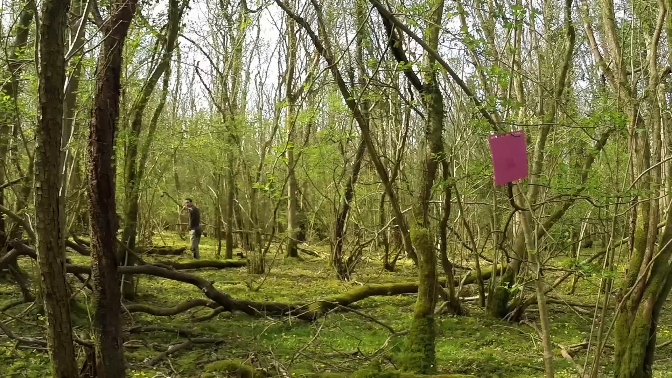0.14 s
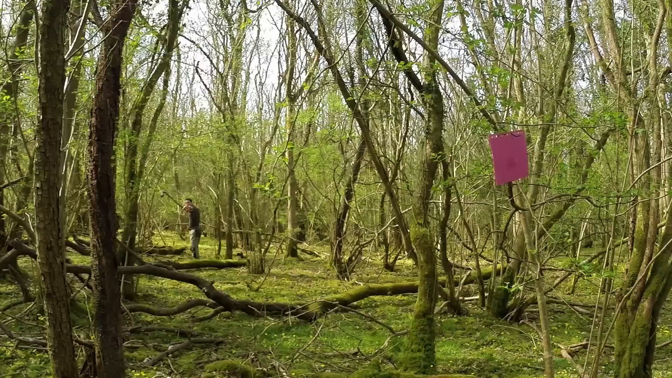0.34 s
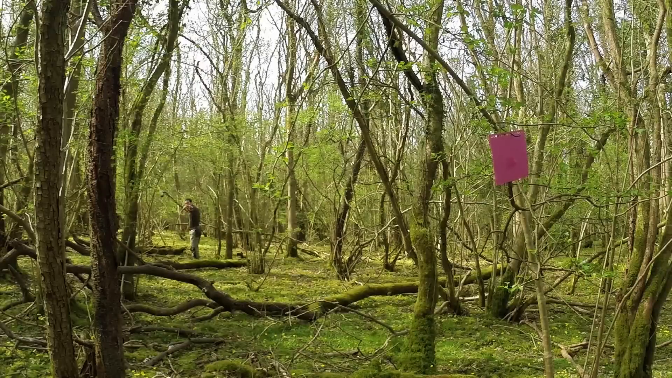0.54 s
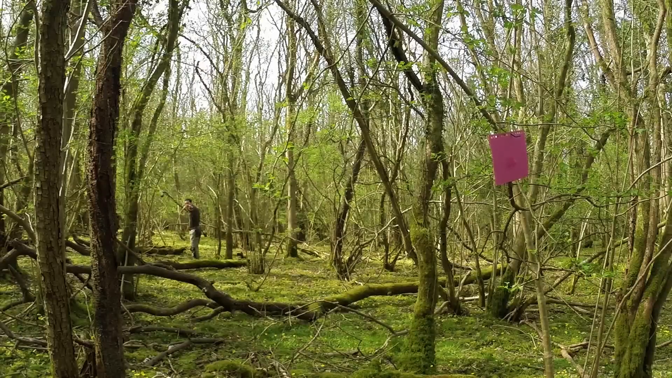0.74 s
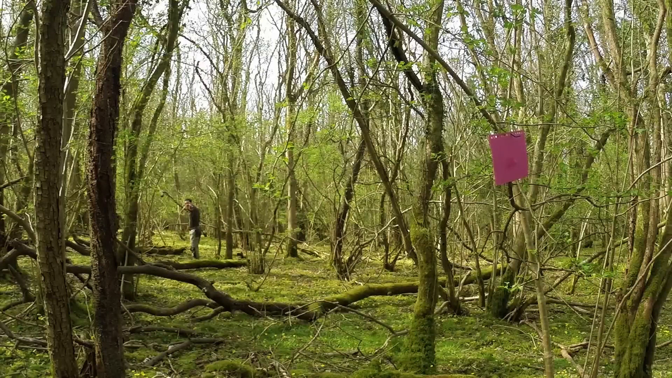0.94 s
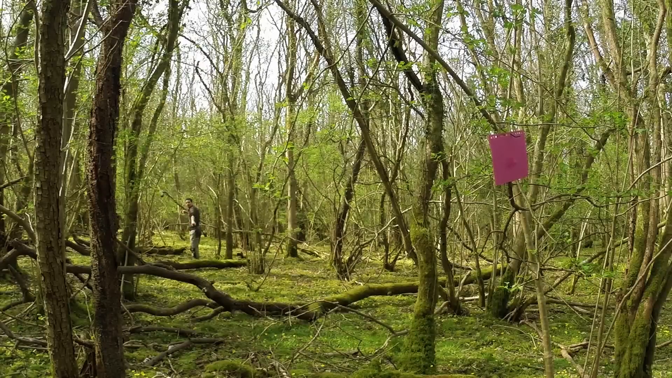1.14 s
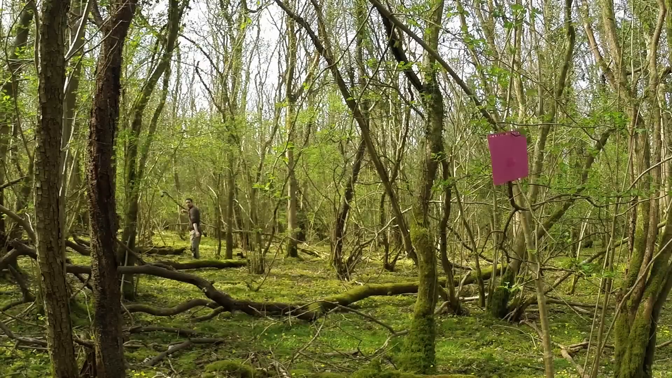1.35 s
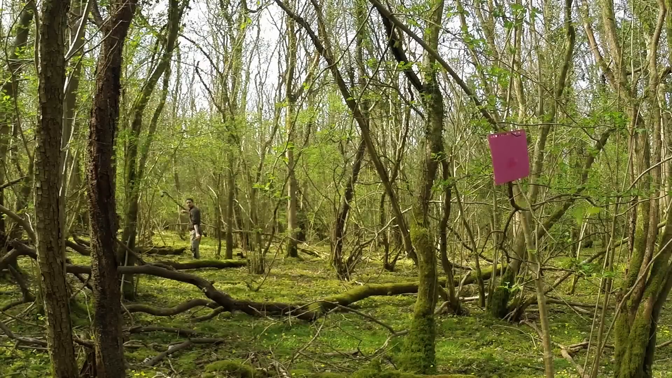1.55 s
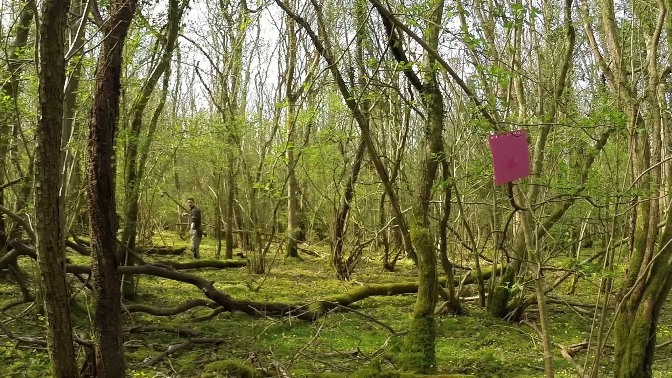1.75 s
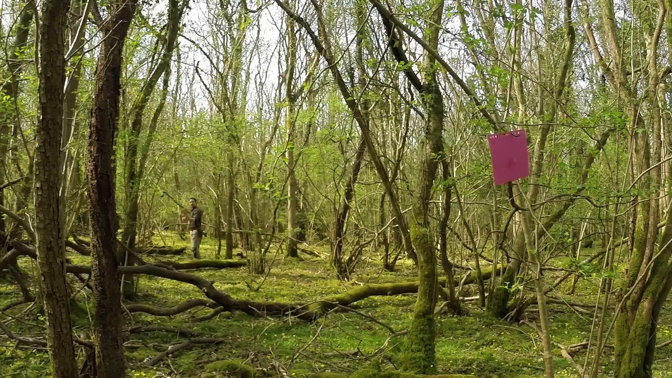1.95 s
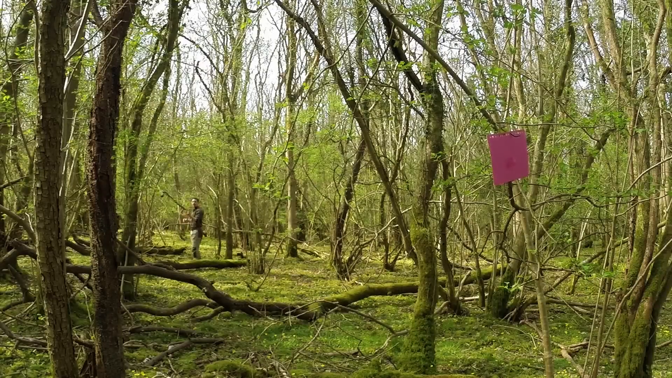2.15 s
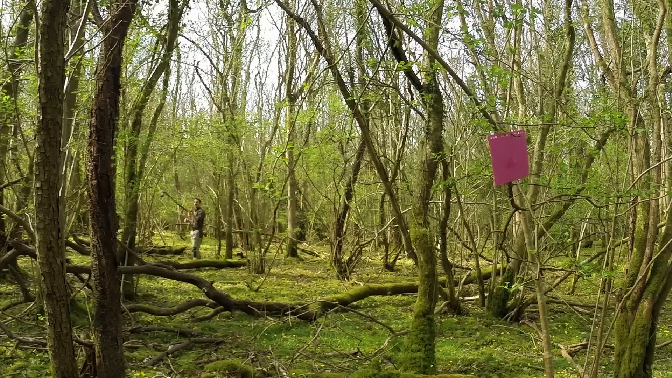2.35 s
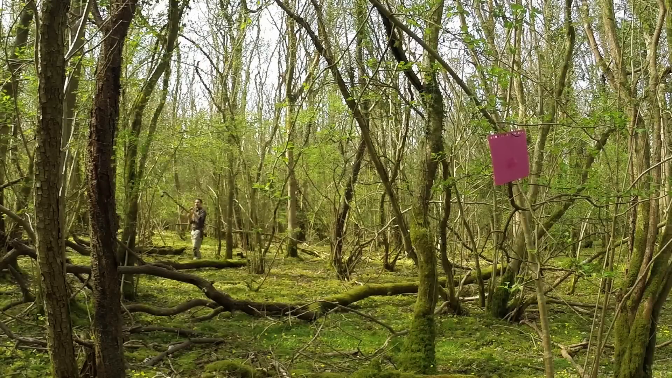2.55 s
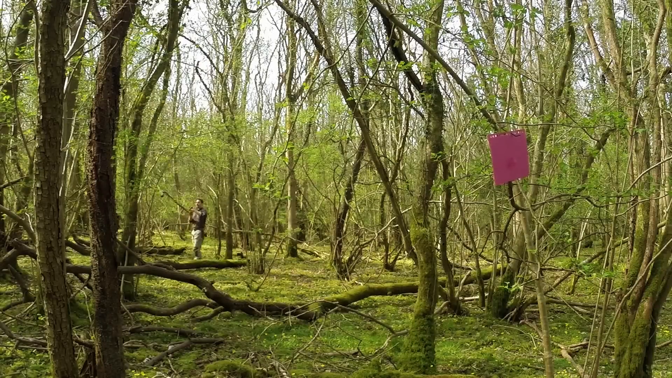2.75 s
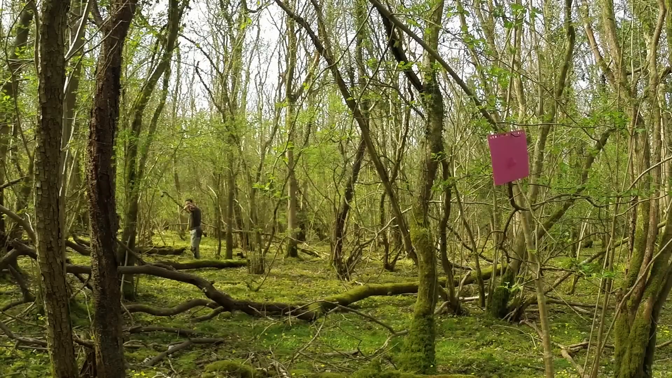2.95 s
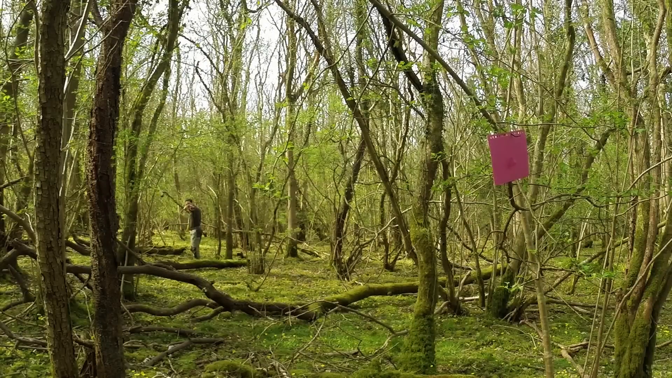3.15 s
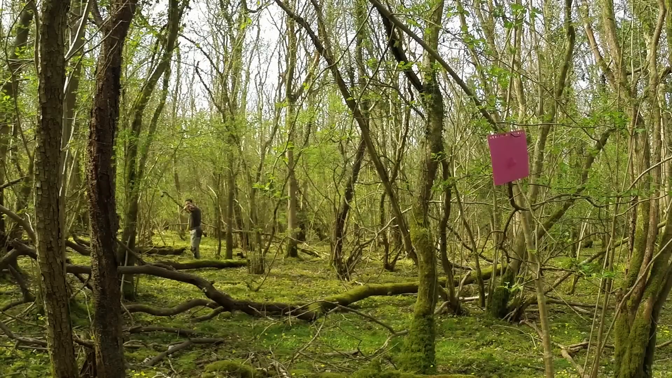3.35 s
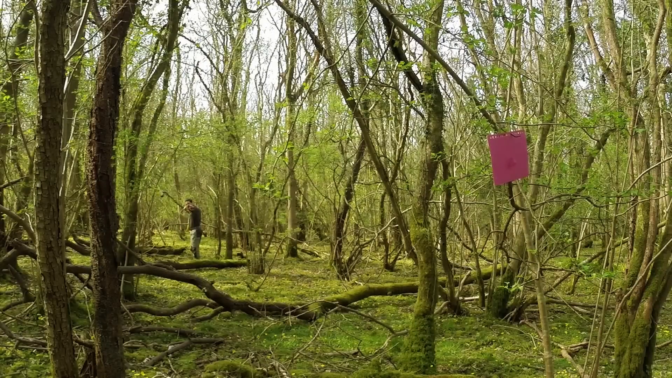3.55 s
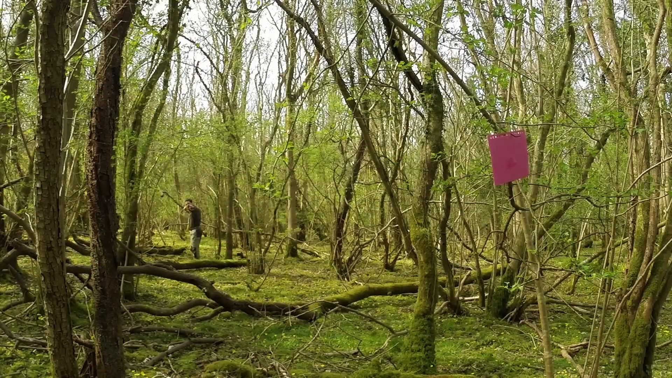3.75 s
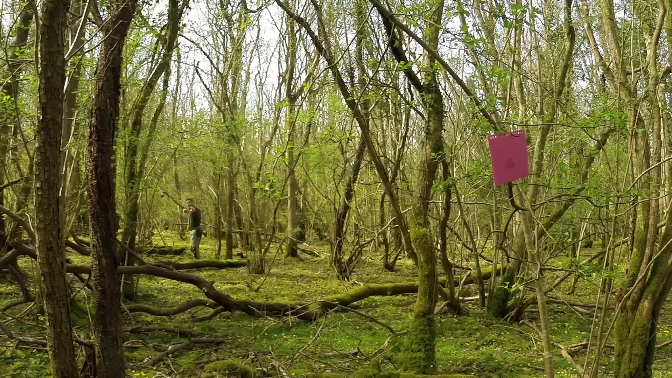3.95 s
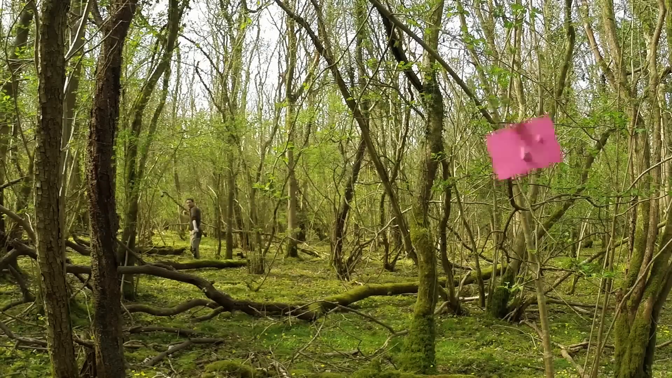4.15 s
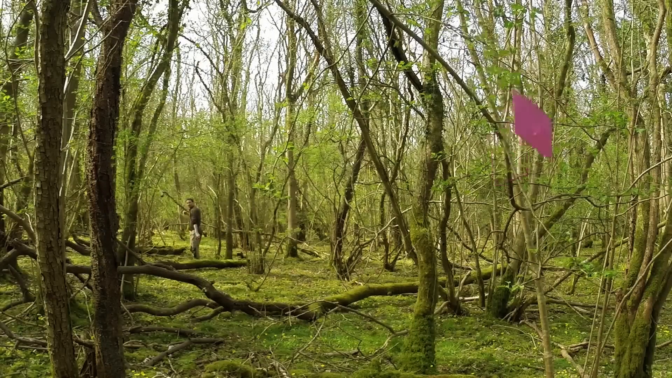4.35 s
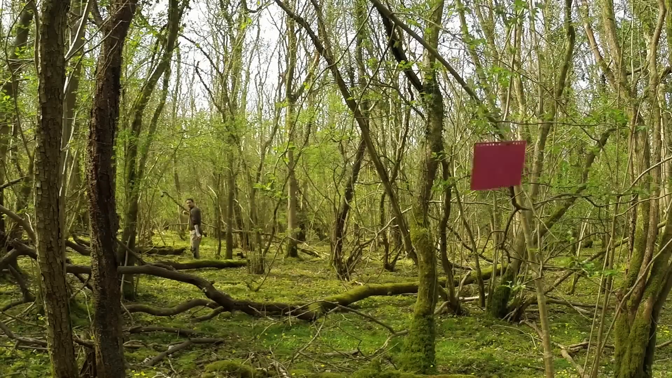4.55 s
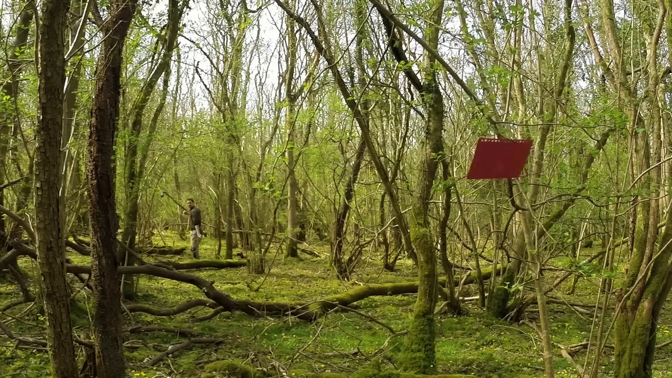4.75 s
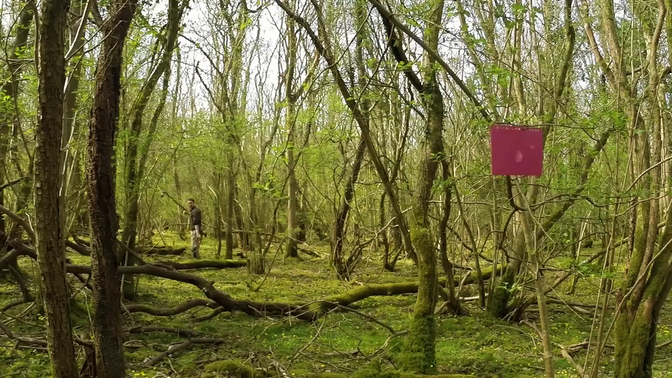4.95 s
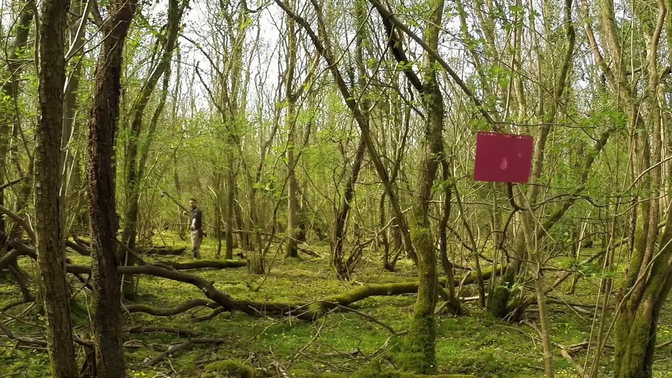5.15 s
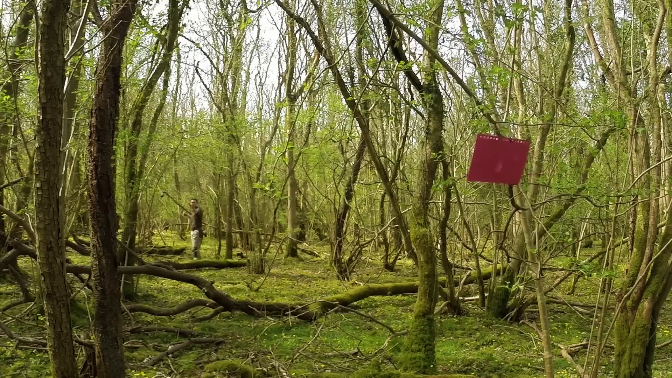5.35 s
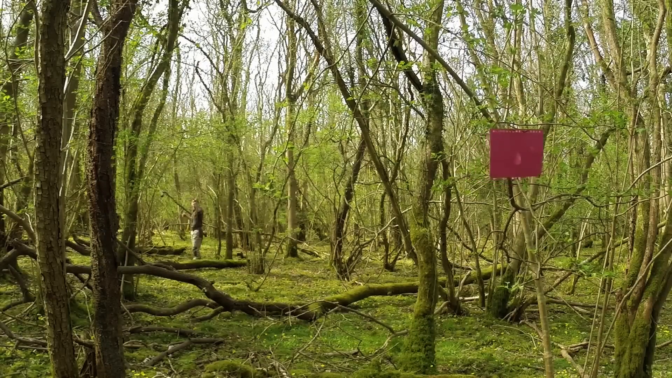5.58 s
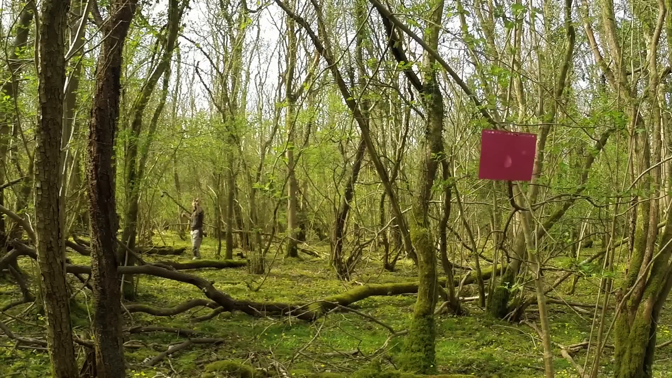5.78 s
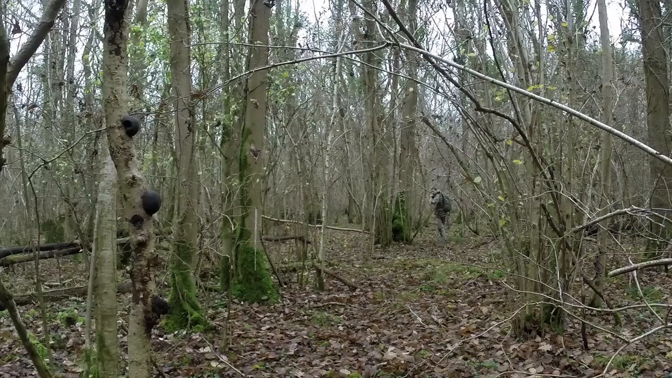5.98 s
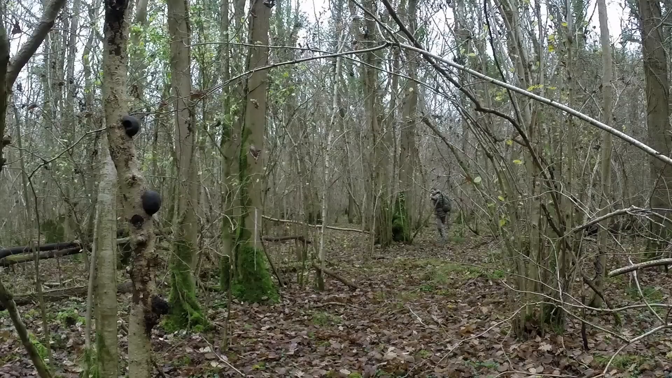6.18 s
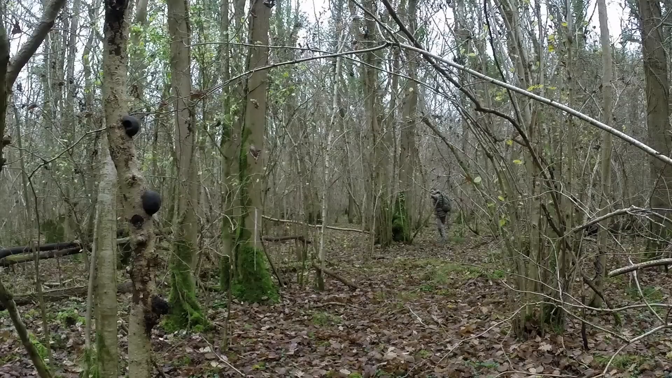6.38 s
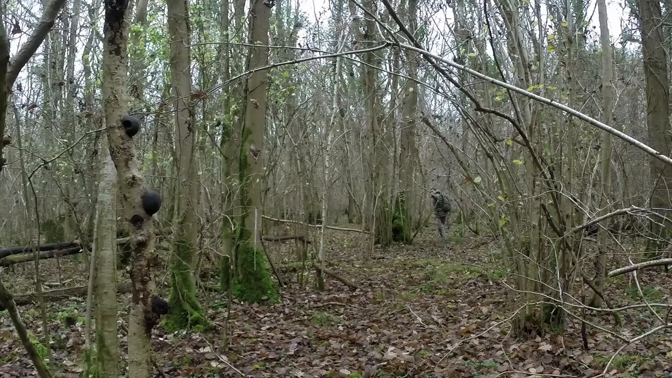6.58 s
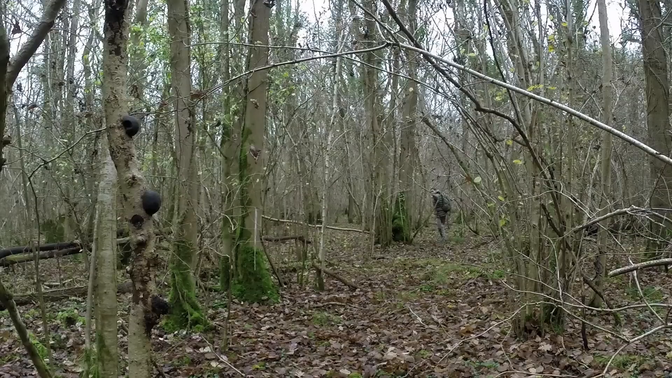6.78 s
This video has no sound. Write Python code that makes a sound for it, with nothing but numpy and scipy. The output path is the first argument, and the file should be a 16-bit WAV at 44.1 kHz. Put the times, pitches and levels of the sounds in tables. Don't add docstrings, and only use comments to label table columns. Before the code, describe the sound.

Far birds whistle and call while a woodpecker drums softly on a hollow bough. Rubber bands snap, a ball rushes past and knocks on wood with sharp rebounds and a long woodland echo. After thin, high birdsong, another snap is followed almost at once by a distorted smack on a spinning card, which flexes and rattles as the level ducks. Quick chirps return, and low puffing wind strikes the little microphone.

```python
import sys
import numpy as np
from scipy import signal
from scipy.io import wavfile
from scipy.ndimage import uniform_filter1d

SR = 44100
rng = np.random.default_rng(int(sys.argv[2]) if len(sys.argv) > 2 else 0)


def magnitude_from_level(level_db):
    exponent = np.asarray(level_db, float) / 20
    return 10 ** exponent


def unload_audio(sound):
    columns = np.transpose(np.atleast_2d(sound))
    steps = np.round(np.clip(columns, -1, 1) * 32767)
    wavfile.write(sys.argv[1], SR, steps.astype(np.int16))


N = 300762
TIME = np.arange(N) / SR

# [f/Hz, level/dB per Hz]
SNAP_TAILS = [
    [(29, -53.5), (50, -16), (170, -0.5), (237, -10.5), (465, -15.5), (499, -3), (576, -7.5), (3490, -3),
     (4300, -5), (5100, 1.5), (5700, -0.5), (6490, -9), (10500, -6.5), (15400, -27.5)],
    [(29, -45), (50, -17), (348, -8), (432, -15.5), (524, -6.5), (953, -12), (1150, -6.5), (1870, -11),
     (2150, -3.5), (3560, -5), (4000, -6.5), (4460, -0.5), (4900, -1.5), (5500, -9.5), (10200, -9),
     (15400, -38)],
]
# [f/Hz, level/dB per Hz]
CARD_TAIL = [(59, -49), (100, -18), (420, -12), (600, -14.5), (800, -11), (1330, -4.5), (2300, -2),
             (3000, -1), (3600, -9), (5100, -15.5), (8900, -24.5), (12700, -30), (15400, -43)]


def evened(x):
    return x / np.sqrt(np.mean(x ** 2) + 1e-20)


def read(points, hz):
    f, value = np.transpose(points)
    return np.interp(np.log(hz + 1), np.log(f + 1), value)


def add(mix, s, sound):
    part = mix[..., round(s * SR):][..., :sound.shape[-1]]
    part += sound[..., :part.shape[-1]]


def columns(rows):
    s, *values = np.transpose(rows)
    t = np.arange(s[0], s[-1], 1 / SR)
    return s[0], *(np.interp(t, s, v) for v in values)


def resonate(x, hz, width):
    turn = np.exp(2j * np.pi * np.cumsum(hz * np.ones(len(x))) / SR)
    r = np.exp(-np.pi * width / SR)
    return 2 * (turn * signal.lfilter([1 - r], [1, -r], x / turn + 1e-18)).real


def noise(seconds, colour, same=1., tilt_db=0., t60=None, patchy_db=0., size=512):
    edge_hz = 15350
    hop = size // 4
    frames, hz = int(seconds * SR) // hop + 5, np.fft.rfftfreq(size, 1 / SR)
    a, b, c, d, patches = rng.standard_normal((frames, len(hz), 5)).T
    patches = uniform_filter1d(uniform_filter1d(patches, size=6, axis=0), size=9, axis=1)
    tilted_db = read(colour, hz) + tilt_db * np.log2((hz + 50) / 2500)
    edge_db = 60 * np.clip((hz - edge_hz) / 200, 0, 1)
    db = (tilted_db - edge_db)[:, None] + patchy_db * evened(patches)
    if t60:
        db = db - 60 * np.arange(frames) * hop / SR / read(t60, hz)[:, None]
    same = np.clip(same if np.isscalar(same) else read(same, hz)[:, None], -1, 1)
    mid = a + 1j * b
    apart = np.sqrt((1 - same) / (1 + same + 1e-9)) * (c + 1j * d)
    z = np.array([mid + apart, mid - apart]) * magnitude_from_level(db)
    return signal.istft(z, nperseg=size, noverlap=size - hop)[1][:, :int(seconds * SR)]


def scattered(colour, tilt_db, stretch, build_s, near_db, seconds):
    # [f/Hz, t60/s]
    trunks = [(100, 0.46), (400, 0.97), (1000, 1.39), (1550, 1.31), (2000, 1.16), (3500, 1.064),
              (6000, 0.81), (10000, 0.43), (15000, .3)]
    decay = [(f, t60 * stretch) for f, t60 in trunks]
    tail = noise(seconds, colour, 1.0, tilt_db, decay, patchy_db=.5, size=256)
    t = TIME[:tail.shape[1]]
    near = 1 + magnitude_from_level(near_db) * np.exp(-t / 0.055)
    return tail / np.sqrt(np.mean(tail[:, :800] ** 2)) * near * (1 - np.exp(-t / build_s))


def sung(notes, arch, rise, sag_db):
    for s, length, from_hz, to_hz, db in notes:
        u = np.linspace(0, 1, int(length * SR))
        hz = (from_hz + (to_hz - from_hz) * u) * (1 + arch * np.sin(np.pi * u))
        yield s, hz, db - 8 * np.maximum(1 - u / rise, 0) - sag_db * u ** 2


def whirr(curves, width, skirt):
    out = np.zeros(N)
    for s, hz, db in curves:
        white = rng.standard_normal(len(hz))
        core = evened(resonate(resonate(white, hz, width), hz, width))
        wide = evened(resonate(resonate(white, hz, 4 * width), hz, 4 * width))
        add(out, s, magnitude_from_level(db) * evened(core + skirt * wide) * signal.windows.tukey(len(hz), .12))
    return out


def hush():
    # [f/Hz, level/dB per Hz]
    colour = [(15, -39), (25, -13), (64, 1.5), (122, -7.5), (155, 3.5), (188, -10), (312, -8.5),
              (409, -12.5), (645, -13), (844, -14.5), (915, -16), (4010, -24), (6330, -27.5),
              (14200, -29.5), (15400, -36.5)]
    # [f/Hz, likeness]
    likeness = [(60, 1), (190, .9995), (330, .994), (550, 0.988), (1100, 0.996), (3400, 0.997),
                (5500, 0.92), (11000, 0.9), (12800, 0.97)]
    return magnitude_from_level(-55) * evened(noise((N + 9) / SR, colour, likeness, patchy_db=2.0, size=1024))[:, :N]


def breeze():
    fading = (-45.5, 27)
    # [f/Hz, level/dB per Hz]
    colour = [(15, -40), (25, -14), (86, 6), (273, -19), (304, -10), (891, -6), (1410, -10), (1840, -11),
              (3240, -15), (15400, -40.5)]
    start_db, loss_db = fading
    out, db = np.zeros((2, N)), start_db - loss_db * TIME[:SR]
    rustle = evened(noise(1.2, colour, 1.0, patchy_db=0.0, size=1024))[:, :len(db)]
    add(out, 0, magnitude_from_level(db - 3.5) * rustle)
    return out


def gust():
    # [t/s, level/dB, f/Hz]
    moan_curve = [
        (5.55, -81.5, 171.8),
        (5.8, -55.5, 169.5),
        (6.03, -42, 168.4),
        (6.28, -43, 181),
        (6.48, -40.5, 197.4),
        (6.62, -43, 175.2),
        (6.82, -40, 190),
    ]
    # [t/s, half width/s, level/dB]
    puffs = [(6.078, 0.029, 7), (6.203, .022, 10), (6.31, 0.021, 9), (6.36, 0.024, 9), (6.42, 0.02076, 8),
             (6.53, 0.023, 5.5), (6.592, 0.013, 3.5), (6.658, 0.016, 14), (6.795, 0.025, 9)]
    # [f/Hz, level/dB per Hz]
    roar_colour = [(15, -52), (25, -29), (48, 1.5), (122, -8), (168, -2.5), (214, -3), (398, -29),
                   (758, -22.5), (992, -24.5), (1230, -33), (1610, -29), (2100, -45), (2340, -64.5),
                   (2980, -57.5), (15400, -43)]
    # [f/Hz, likeness]
    likeness = [(50, .98), (100, .99), (140, 1)]
    s, gust_db, hz = columns(moan_curve)
    t = s + TIME[:len(hz)]
    moan_db = gust_db + sum(db * np.exp(-((t - at) / half) ** 2) for at, half, db in puffs)
    roar_db = -57.5 + .65 * (gust_db + 43) + 8 * (t - 6.3)
    white = rng.standard_normal(len(hz))
    moan = resonate(resonate(white, hz, 50.0), hz, 48.7)
    steady = moan / np.sqrt(uniform_filter1d(moan ** 2, size=2500) + 1e-9)
    roar = evened(noise(1.4, roar_colour, likeness, patchy_db=3.0, size=1024))[:, :len(hz)]
    fade = np.minimum(np.arange(len(hz)) / 4000, 1)
    out = np.zeros((2, N))
    add(out, s, fade * magnitude_from_level(moan_db - 2.0) * steady)
    add(out, s, fade * magnitude_from_level(roar_db + 12.5) * roar)
    return out


def wind_in_gaps():
    # [t/s, length/s, from f/Hz, to f/Hz, level/dB]
    moans = [
        (5.73, 0.59, 987, 985, -62.5),
        (5.99, 0.37, 758, 735, -62),
    ]
    return whirr(sung(moans, .002, 0.062, 3.54), 58.2, 0.2)


def far_birds():
    # [t/s, length/s, from f/Hz, to f/Hz, level/dB]
    warbles = [(.6, 0.12, 2850, 2850, -71), (.86, 0.47, 2930, 2900, -68), (2.1, 0.32, 7600, 7330, -67.5),
               (2.25, 0.28, 2700, 2650, -59.5), (2.63, 0.15, 2830, 2800, -60), (2.72, 0.3, 2570, 2610, -56),
               (2.98, 0.2, 2570, 2400, -64.5), (3.02, 0.23, 2920, 2850, -64), (2.76, 0.12, 2900, 2900, -60),
               (4.62, .13, 4950, 4960, -60), (4.85, 0.15, 3420, 3430, -57), (3.655, 0.022, 2050, 1970, -59),
               (2.9, 0.266, 1800, 1776, -71.5), (3.57, 0.18, 2730, 2850, -58.5),
               (3.59, 0.14, 1926, 1910, -67), (3.75, 0.22, 1830, 1790, -68),
               (3.79, 0.23, 2970, 2860, -49.5), (5.67, 0.32, 2309, 2370, -68)]
    # [t/s, length/s, from f/Hz, to f/Hz, level/dB]
    haze = [
        (.27, 0.17, 3000, 3080, -58.5),
        (.3, 0.68, 2300, 2660, -65),
        (3.15, .65, 2440, 2470, -70),
    ]
    return whirr(sung(warbles, .002, 0.16, 4), 150, 0.92) + whirr(sung(haze, .003, .06, 1.0), 350, 0.44)


def woodpecker():
    # [f/Hz, level/dB, t60/s]
    hollow_bough = [(810, -8, 0.065), (1170, -5.5, 0.16), (1428, 9, 0.027), (1630, -4.5, 0.0538)]
    pecks, t = np.zeros(N), TIME[:6000]
    for k in range(11):
        s = .0074 + .0495 * k - .00055 * k ** 2
        peck_db = -43.5 - 13 * ((k - 2) / 8) ** 2
        add(pecks, s, magnitude_from_level(peck_db) * np.hanning(12) / 6)
    bough = sum(magnitude_from_level(db - 60 * t / t60) * np.sin(2 * np.pi * hz * t) for hz, db, t60 in hollow_bough)
    dry = signal.oaconvolve(pecks, bough * (1 - np.exp(-t / 0.002)))[:N]
    echoes = rng.standard_normal(SR // 2) * magnitude_from_level(-60 * TIME[:SR // 2] / 1.5)
    return 1.1 * dry + 0.88 * signal.oaconvolve(dry, echoes / np.linalg.norm(echoes))[:N]


def rising_chirps():
    out, t = np.zeros(N), TIME[:1300]
    chirp = np.sin(2 * np.pi * (3650 * t + 14000 * t ** 2)) * np.hanning(len(t))
    for s in 5.389 + .0958 * np.arange(8):
        uneven_db = .8 * rng.standard_normal()
        db = -60.5 + uneven_db - 1.5 * ((s - 5.62) / .4) ** 2
        add(out, s - .008, magnitude_from_level(db) * chirp)
    return out


def songs():
    # [t/s, length/s, from f/Hz, to f/Hz, level/dB]
    whistles = [(0, .03, 2180, 2235, -49), (.06, 0.06, 2100, 1980, -60.5), (.04, .085, 3230, 3110, -62),
                (.72, 0.065, 3260, 3330, -63), (1.014, .025, 3713, 3720, -69), (.69, .035, 4700, 3600, -66),
                (3.68, .115, 3150, 3190, -59), (2.31, .045, 4760, 4660, -63)]
    # [t/s, length/s, from f/Hz, to f/Hz, level/dB]
    thin = [(1.635, 0.15, 7880, 7880, -55.5), (1.735, 0.066, 7670, 7800, -55),
            (1.86, 0.076, 8100, 7180, -54.5), (1.925, 0.063, 7230, 7700, -57.5),
            (2.01, 0.06, 7930, 6830, -49.5), (2.066, 0.027, 7550, 6670, -50),
            (4.77, 0.087, 4310, 3430, -50)]
    # [t/s, length/s, from f/Hz, to f/Hz, level/dB]
    nasal = [(2.155, 0.13, 6650, 6430, -59.5), (2.36, 0.17, 6550, 6900, -60.5),
             (2.565, 0.13, 6810, 6750, -58.5), (2.77, 0.13, 6690, 6930, -61)]
    # [partial/eighths of that pitch, level/dB]
    nasal_stack = [(3, -9), (4, -6), (5.13, -3), (6, -20), (8, 2.5), (9, -17), (10, -16)]
    # [t/s, top f/Hz, level/dB]
    chups = [(.54, 2970, -46.5), (0.786, 3030, -44.5), (3.538, 2960, -48.5)]
    # [t/s, share of top f, level/dB]
    chup = [
        (0, 0.96, -9),
        (.012, 0.95, -5),
        (.026, 0.97, 0.3),
        (.034, .94, -6),
        (.04, 0.89, -16),
        (.052, 0.94, -11.5),
        (.07, 0.98, -17.5),
    ]
    hooks = [columns([(s + t, hz * share, db + d) for t, share, d in chup]) for s, hz, db in chups]
    clear = [*sung(whistles, 0.0027, .15, 4.4), *sung(thin, -0.0054, 0.49, 4.8), *hooks]
    out = np.zeros(N)
    for notes, stack in ((clear, [(8, 0)]), (sung(nasal, 0.0203, 0.15, 10.0), nasal_stack)):
        for s, hz, db in notes:
            waver = evened(uniform_filter1d(rng.standard_normal(len(hz)), size=300))
            turns = np.cumsum(hz * (1 + 0.01 * waver)) / SR / 8
            tone = sum(magnitude_from_level(d) * np.sin(2 * np.pi * k * turns) for k, d in stack)
            add(out, s, np.sqrt(2) * magnitude_from_level(db) * tone * signal.windows.tukey(len(hz), .15))
    chirps = rising_chirps()
    near = rng.standard_normal(SR) * magnitude_from_level(-60 * TIME[:SR] / 0.32)
    low_pass = signal.butter(4, 3800, fs=SR, output="sos")
    far = signal.sosfilt(low_pass, rng.standard_normal(SR)) * magnitude_from_level(-60 * TIME[:SR] / 1.4)
    echoes = 0.45 * near / np.linalg.norm(near) + 0.38 * far / np.linalg.norm(far)
    return 0.71 * out + chirps + signal.oaconvolve(out + 0.97 * chirps, echoes)[:N]


def flights():
    # [heard from t/s, nearest t/s, stopped t/s, whirr f/Hz, level at the nearest/dB]
    balls = [
        (1.208, 1.296, 1.325, 890, -31),
        (4.118, 4.209, 4.206, 871, -32.5),
    ]
    speed, miss_m = 64, .7
    for s, past, end, hz, db in balls:
        t = np.arange(s, end, 1 / SR) - past
        far = np.hypot(miss_m, speed * t)
        away = speed ** 2 * t / far
        wake_db = 406 * np.maximum(t, 0)
        yield s, hz / (1 + away / 343), db - 20.5 * np.log10(far / miss_m) - wake_db


def rush():
    s, _, whirr_db = next(flights())
    db = -35.5 + 0.56 * (whirr_db - whirr_db.max())
    out = np.zeros((2, N))
    hiss = evened(noise(0.22, SNAP_TAILS[1], 1.0, -2.3))[:, :len(db)]
    add(out, s, magnitude_from_level(db) * hiss * signal.windows.tukey(len(db), .5))
    return out


def thuds():
    # [t/s, peak level/dB, f/Hz, t60/s]
    modes = [(1.119, -18.5, 96, 0.078), (1.1205, -9.5, 796, 0.028), (4.0333, -25, 224, 0.045),
             (1.285, -29, 265, 0.032), (1.424, -26.5, 129, 0.057), (1.425, -36, 290, 0.12),
             (4.0377, -19.5, 95.6, 0.078), (4.028, -23, 900, .01), (4.031, -16.5, 610, 0.021),
             (4.2096, -13, 1000, .02), (4.2085, -9, 1340, .015), (4.35, -25.5, 162, 0.085),
             (4.47, -39, 43.6, .15), (4.685, -39, 446, 0.11), (4.89, -28.5, 164, 0.053)]
    out, t = np.zeros(N), TIME[:SR // 2]
    for s, db, hz, t60 in modes:
        add(out, s, magnitude_from_level(db - 60 * t / t60) * np.sin(2 * np.pi * hz * t) * (1 - np.exp(-t / 0.0014)))
    return out


def card_wobble():
    # [t/s, length/s, from f/Hz, to f/Hz, level/dB]
    wobble = [
        (4.24, .1, 158.7, 193, -41),
        (4.345, 0.102, 153, 162, -48),
    ]
    out = np.zeros(N)
    for s, hz, db in sung(wobble, .03, .4, 5.5):
        tone = np.sin(2 * np.pi * np.cumsum(hz) / SR)
        add(out, s, magnitude_from_level(db + 7.0) * tone * signal.windows.tukey(len(hz), .2))
    return out


def card_push():
    # t/s, length/s, level/dB
    push = (4.2068, .0056, 9)
    s, length, db = push
    return -magnitude_from_level(db) * np.exp(-abs((TIME - s - length / 2) / (length / 2)) ** 4)


def ticks():
    # [t/s, peak level/dB, length/s, from f/Hz, to f/Hz]
    events = [(1.2843, -5.5, 0.00021, 100, 16500), (1.85, -18, .002, 1700, 4000),
              (2.558, -28, 0.00083, 905, 7000), (1.846, -38, .003, 151, 600),
              (4.352, -15.5, 0.0035, 2000, 7020), (4.8727, -35.5, .003, 4800, 14000),
              (4.886, -43.5, 0.0044, 3050, 14000), (4.94, -46, 0.0023, 5500, 8000),
              (5.8, -47, 0.0021, 1500, 3800), (6.118, -38, 0.0043, 4900, 6600)]
    out, t = np.zeros((2, N)), TIME[:3000]
    for s, db, length, from_hz, to_hz in events:
        tick = np.exp(-t / length) * (.5 * rng.standard_normal(len(t)) + (t == 0))
        band = signal.butter(2, (from_hz, to_hz), "band", fs=SR, output="sos")
        add(out, s, magnitude_from_level(db) * signal.sosfilt(band, tick))
    return out


def bands():
    # [t/s, peak level/dB, burst t60/s, scattered level/dB, whip brightness/dB per octave]
    snaps = [
        (1.1184, -11.5, 0.033, -2.5, 4),
        (1.159, -25.5, 0.042, -12.5, 1.5),
        (1.176, -36, 0.016, -17, 3.5),
        (4.030, -12, 0.047, -2, 6.5),
        (4.0774, -19.5, 0.016, -17, -0.2),
    ]
    # [f/Hz, level/dB per Hz]
    colour = [(29, -30.5), (50, -0.5), (402, -10.5), (826, -1), (1580, -8.5), (2150, -4), (3480, -1.5),
              (3920, -6), (5100, -2.5), (7310, -8), (9980, -9.5), (13300, -14.5), (15200, -21),
              (16200, -45.5)]
    out, t = np.zeros((2, N)), TIME[:3000]
    for s, db, t60, wet_db, bright_db in snaps:
        shape = (1 - np.exp(-(t / 0.0012) ** 2)) * magnitude_from_level(-60 * t / max(t60, .003))
        burst = evened(noise(3000 / SR, colour, 1.0, size=1024)) * shape / shape.max()
        whip = evened(noise(3000 / SR, colour, 1.0, bright_db, size=1024))
        whip = whip * np.exp(-((t - .001 - 0.0013) / 0.0017) ** 2)
        swish = evened(noise(600 / SR, colour, 1.0, -1.7, size=1024))
        swish = swish * np.exp((t[:600] - t[600]) / 0.0052)
        tail = scattered(SNAP_TAILS[s > 2], 0, 0.9, 0.0008, 3.1, seconds=.5 if wet_db < -8 else .8)
        add(out, s - .001, magnitude_from_level(db) * (burst + magnitude_from_level(2.5) * whip))
        add(out, s - t[600], magnitude_from_level(db - 16) * swish)
        add(out, s, magnitude_from_level(db + wet_db - 15.0) * tail)
    return out


def late_swell():
    # t/s, level/dB, stretch of the decay, build-up/s
    swell = (4.5, -31.5, 1.16, 0.37)
    s, db, stretch, build_s = swell
    out = np.zeros((2, N))
    add(out, s, magnitude_from_level(db) * scattered(CARD_TAIL, -1.2, stretch, build_s, -28, seconds=1.1))
    return out


def cracks():
    # [t/s, peak level/dB, ring f/Hz, ring t60/s, scattered
    # level/dB]
    blows = [(1.1026, -29, 2800, 0.0046, 0), (1.284, -14, 1760, 0.0043, -27),
             (1.422, -7, 2870, 0.0086, 1.5), (1.4225, -15, 2090, 0.013, -42), (1.847, -26, 1260, 0.0048, 8),
             (2.558, -44.5, 2800, 0.0043, -4), (4.014, -31, 2390, 0.0059, -6),
             (4.033, -14, 2450, 0.008, -40), (4.2116, -0.66, 3050, 0.0087, 4),
             (4.2239, -5, 2700, 0.012, -11), (4.353, -10, 2760, 0.0069, 5.5)]
    # [t/s, peak level/dB, ring f/Hz, ring t60/s, scattered level/dB]
    card_ring = [
        (4.20565, 12.5, 2900, .0128, -40),
        (4.2096, 5, 2300, .0125, -40),
        (4.2136, -12, 2700, .012, -40),
    ]
    # [f/Hz, level/dB per Hz]
    splinter_colour = [(35, -49.5), (60, -14), (421, -6.5), (1140, -19), (1860, -7.5), (3030, -9),
                       (5290, -17.5), (6670, -12), (8030, -26.5), (9440, -19), (11100, -33.5), (13700, -35),
                       (15400, -48.5)]
    # [f/Hz, level/dB per Hz]
    wood_tail = [(60, -30), (241, -8.5), (421, -19), (570, -10), (826, -15.5), (1270, -10), (1500, -3),
                 (2300, -2.5), (2900, 1.5), (3600, -5.5), (4300, -14.5), (10300, -23), (15400, -45.5)]
    # [f/Hz, level/dB per Hz]
    far_tail = [(100, -28), (300, -13), (471, -32), (666, -11.5), (1000, -9.5), (1150, -5), (1400, -5.5),
                (1700, -11.5), (2730, -10), (3600, -17), (6400, -38), (8320, -55), (14000, -90)]
    out, t = np.zeros((2, N)), TIME[:3000]
    for s, db, hz, t60, wet_db in blows + card_ring:
        far, card, wet = hz < 1700, s > 4.2, wet_db > -35
        colour = far_tail if far else CARD_TAIL if card else wood_tail
        fall = magnitude_from_level(-60 * (t / max(t60, .002)) ** 2) * (1 - np.exp(-t / (0.034 * max(t60, .002))))
        slack = np.minimum(24 * t, .3) * (card and not wet)
        ring = np.sin(2 * np.pi * hz * t * (1 - slack))
        ring = ring + (.5 if wet else .12) * np.sin(2 * np.pi * 1.19 * hz * t + 2)
        splinters = colour if far or s > 4.3 else splinter_colour
        tilt_db = 1.1 * np.log2(hz / 2850) * (not far) + .3
        same = .955 if card and s < 4.22 else 1.
        splinter = evened(noise(3000 / SR, splinters, same, tilt_db, size=1024))
        add(out, s, magnitude_from_level(db) * (ring + (.9 if far else .55 if wet else .3) * splinter) * fall)
        if wet:
            heard_s = np.clip((db + wet_db + 52) / 45, .25, 1.2)
            tail_tilt_db = .6 if card else .3 if far else .7
            stretch = 1.02 if card else .92 if far else .97
            tail = scattered(colour, tail_tilt_db, stretch, 0.0014, -3 if far else 6, heard_s)
            add(out, s, magnitude_from_level(db + wet_db - 22.5) * tail)
    return out


def scene():
    wind = hush() + breeze() + gust() + wind_in_gaps()
    birds = far_birds() + woodpecker() + songs()
    ball = whirr(flights(), 210, 0.57) + rush()
    card = card_wobble() + card_push()
    return wind + birds + ball + thuds() + card + ticks() + bands() + late_swell() + cracks()


def roll_off(x):
    return signal.sosfilt(signal.butter(12, 15520, fs=SR, output="sos"), x)


def record(dry):
    power_db = 10 * np.log10(abs(uniform_filter1d((dry ** 2).mean(0), size=200)) + 1e-12)
    fall = TIME * 45.0
    over_db = np.maximum(np.maximum.accumulate(power_db + fall) - fall + 0.5, 0)
    late_db = signal.lfilter(np.r_[np.zeros(330), np.ones(80) / 80], 1, over_db)
    held = np.clip(dry, -1.3, 1.5)
    coupled = signal.lfilter([1, -1], [1, -np.exp(-2 * np.pi * 64 / SR)], held)
    shaken = np.exp(-abs((TIME - 4.352) / .125) ** 6)
    lows = signal.sosfilt(signal.butter(2, 450, fs=SR, output="sos"), coupled)
    coupled = coupled + magnitude_from_level(-10) * shaken * lows * [[1], [-1]]
    return roll_off(np.clip(coupled / magnitude_from_level(1.35 * late_db), -1, 1))


dry = scene()
out = record(dry)
unload_audio(out)
```